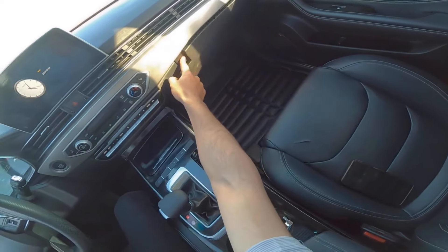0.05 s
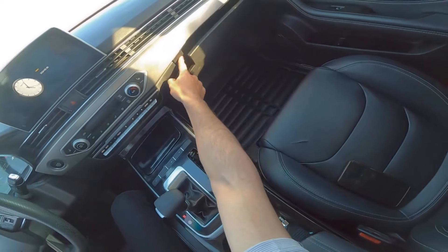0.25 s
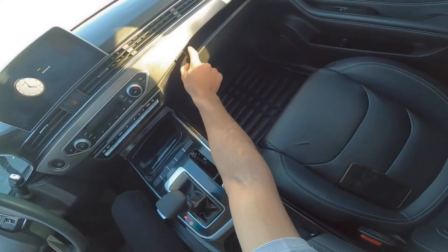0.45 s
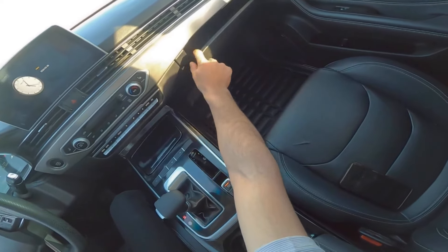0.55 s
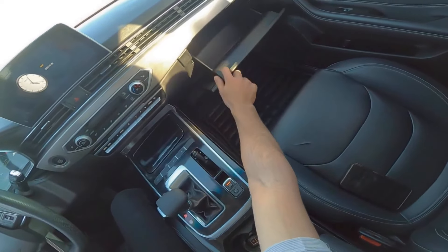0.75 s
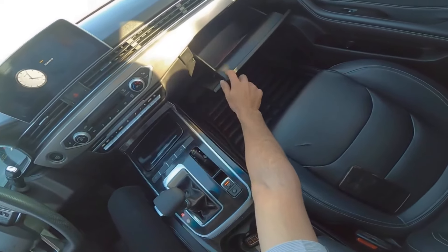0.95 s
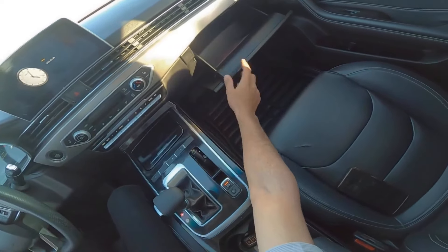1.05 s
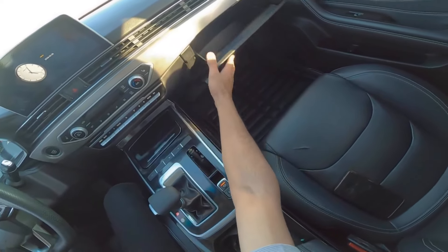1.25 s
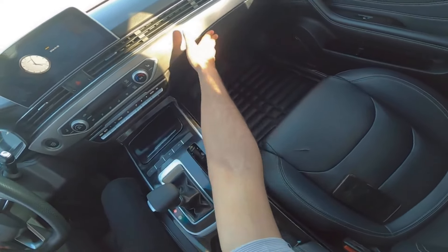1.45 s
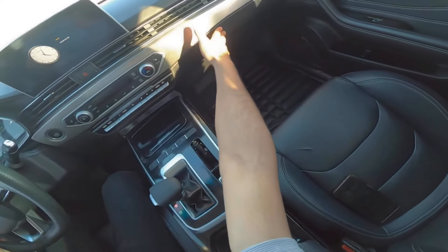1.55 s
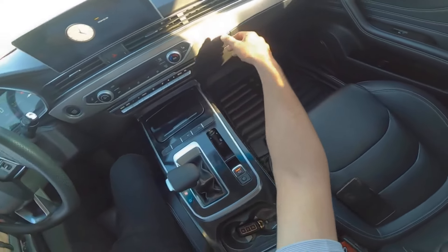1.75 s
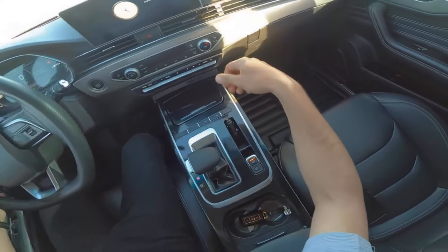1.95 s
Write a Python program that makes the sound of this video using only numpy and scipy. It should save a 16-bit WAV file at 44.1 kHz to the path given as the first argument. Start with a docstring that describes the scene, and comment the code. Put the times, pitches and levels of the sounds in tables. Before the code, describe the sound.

A plastic glove box is opened and shut close by inside a parked car, over a faint low idle hum. The latch clicks with a thud at 0.2 seconds and the handle snaps back at 0.5. The lid drops open with a thump and small bounce around 1 second, knocks lightly when lifted at 1.4, and shuts with a booming double clack at 1.6. Faint finger taps follow.

```python
"""Inside a parked car, engine idling; a stereo microphone in the cabin, the glove box close on the right.
A hand pulls the latch and lets the handle spring back. The plastic lid drops onto its stop and bounces,
is lifted, and is pushed shut with a double clack. Each knock is a short dense rattle of plastic
plus the modes of the struck part; heavy ones make the cabin boom."""
import sys
import numpy as np
from scipy import signal
from scipy.fft import rfft, irfft
from scipy.io import wavfile
from scipy.ndimage import uniform_filter1d

SR = 44100
rng = np.random.default_rng(int(sys.argv[2]) if len(sys.argv) > 2 else 0)


def transcribe(u):
    """Save the signal u as a 16-bit wav file named by the first command-line argument.

    u: samples, shape (n,) or (channels, n), limited to [-1, 1]; the rate is SR.
    q: integer samples, one column per channel.
    """
    v = np.clip(np.atleast_2d(u).T, -1, 1)
    q = np.round(v * 32767).astype(np.int16)
    wavfile.write(sys.argv[1], SR, q)


N = 88200
T = np.arange(N) / SR
BANDS_HZ = 25 * 2 ** (np.arange(28) / 3)
COLOUR_HZ = (300, 1100, 3000, 7500)  # centres of body, clack, bite and air

# The latch lets go at 0.22 s, the handle springs back at 0.5 s, the lid lands at 0.95 s,
# is lifted at 1.4 s and snaps home at 1.61 s; fingers tap its face at 1.83 s.
# t/s, part, rise/s, hold/s, t60/s, body/dB, clack/dB, bite/dB, air/dB, ring/dB, left minus right/dB
BOX_KNOCKS = [ (0.068, "handle", 0.0035, 0.0071, 0.08, -40.5, -45, -47.5, -49.5, -52.5, -1.5),
              (.090, "handle", 0.0013, .007, 0.12, -39.5, -39.5, -52, -76, -50.5, -2),
              (0.164, "latch", 0.0034, 0.0026, 0.1, -47.5, -68, -54.5, -60.5, -56, -0.5),
              (0.204, "latch", 0.0094, 0.0097, 0.028, -22.5, -28.5, -58, -65, -37.5, -3),
              (0.2158, "latch", 0.0007, 0.0031, 0.1, -21, -17.5, -21.5, -39.5, -21.5, -1.5),
              (0.253, "latch", 0.0067, 0.0095, 0.086, -29, -30, -50, -65.5, -44.5, -2),
              (0.487, "handle", 0.0029, 0.0022, 0.053, -49, -41, -54, -60, -45.5, -11.5),
              (0.4962, "handle", 0.0015, 0.0047, 0.069, -49, -18.5, -33.5, -48, -27.5, 0),
              (.521, "handle", .002, .003, .07, -30.5, -48, -69, -72.5, -50.5, -2.5),
              (0.9477, "lid", 0.0035, 0.0032, .06, -17, -21.5, -30, -43, -18, -0.5),
              (0.96, "lid", 0.0053, 0.0035, 0.25, -25, -31, -39.5, -54, -30.5, -1),
              (1.009, "lid", 0.0071, .004, 0.037, -31.5, -29, -44.5, -64.5, -28, -.5),
              (1.056, "lid", .005, .003, 0.1, -44, -47, -59, -70, -46, -2),
              (1.4012, "lid", 0.0025, 0.0039, 0.042, -35.5, -39.5, -40.5, -57.5, -36.5, -0.5),
              (1.407, "lid", 0.00033, 0.0034, 0.085, -29, -27.5, -40, -54, -41, -3.5),
              (1.421, "lid", 0.0041, .004, 0.076, -44, -47, -54, -66, -27.5, -1.5),
              (1.5553, "handle", 0.00057, 0.0026, 0.083, -36, -33, -30, -41, -39, 0),
              (1.5617, "handle", 0.00056, 0.0036, 0.089, -26, -26, -30.5, -55, -28, -2),
              (1.6144, "latch", 0.0024, 0.002, 0.055, -45.5, -14.5, -15, -29, -23, 0),
              (1.622, "latch", 0.00063, 0.0013, 0.028, -24.5, -20.5, -46.5, -60, -23.5, -3),
              (1.627, "latch", 0.0036, 0.0078, 0.099, -21.5, -26.5, -40.5, -46, -38.5, -1),
              (1.826, "face", 0.0035, 0.0067, 0.058, -63, -56.5, -68.5, -81.5, -51.5, -4),
              (1.879, "face", .006, 0.0029, 0.082, -58, -57, -66, -88, -47, -1.5), ]
# skin and plastic sliding: t/s, rise/s, hold/s, t60/s, body/dB, clack/dB, bite/dB, air/dB
BOX_RUBS = [ (0.13, 0.094, 0.024, .06, -50, -35, -51.5, -76.5),
            (0.846, 0.027, .025, 0.6, -50, -54.5, -65.5, -73.5),
            (1.306, 0.0051, 0.0047, .1, -50, -52.5, -61.5, -64),
            (1.433, 0.0071, 0.0087, 0.75, -64, -58, -62.5, -72),
            (1.577, 0.018, 0.018, 0.038, -38.5, -28, -40.5, -48.5),
            (1.754, 0.01, 0.054, 0.12, -62, -57.5, -69.5, -72.5),
            (1.806, 0.0037, 0.0058, 0.048, -55, -50.5, -64, -76), ]
# modes of the latch, face, lid and handle, by part: f/Hz, level/dB, t60/s
PART_MODES = { "latch": [(165, -12, .14), (229, -1.5, 0.15), (355, -7, .14), (472, -2, 0.11),
              (500, -3, .07), (676, -15, .11), (788, -5.5, .09), (996, -4, .11), (1088, -0.5, 0.055),
              (1164, -13.5, .09), (1453, -1, 0.053), (1946, -8.5, .1), (2840, -9, .07), (3090, -6, .055)],
              "face": [(906, 1, 0.086), (1037, 0, 0.092)], "lid": [(144.6, -0.5, 0.21), (220.5, 0.5, 0.078),
              (270, -4, 0.16), (376, -8.5, 0.17), (464.5, -13.5, 0.31), (568, -4.5, 0.036),
              (743, -8, 0.052), (1009, -24.5, 0.14), (2680, -19.5, .05)], "handle": [(175, -6.5, .15),
              (268, -9, .14), (469, -5.5, .14), (828, -5, .07), (911, -4.5, .07), (1144, -1, .07),
              (1293, 2, 0.055), (1322, -20.5, 0.35), (1492, -8, .08), (1520, -12.5, .08), (2005, -12, .07),
              (2652, -6.5, 0.058), (3040, -8, .045)], }
# slowly fading modes of the shut panel: f/Hz, level/dB, t60/s
PANEL_MODES = [(754, -2, .4), (1020, -8.5, 0.32), (1120, -5, 0.59), (1606, -7.5, 0.41), (1834, -5, .55),
               (2090, -13, 0.18)]
# rattle of the plastic trim, per third octave: f/Hz, level/dB
TRIM_SPECTRUM = [(160, -12.5), (250, -10.5), (330, -17.5), (480, -8), (720, -16), (1100, -13), (1450, -12),
                 (1900, -13.5), (2400, -11.5), (3000, -10), (4200, -9), (5500, -9.5), (7300, -7),
                 (9500, -14.5), (12000, -17), (15000, -22.5)]
# balance of the rattle at the microphone: f/Hz, left minus right/dB
TRIM_BALANCE = [(300, 2), (2000, -1), (4500, -2), (8000, 1.5), (13000, 2.5)]
# lowest modes of the cabin air: f/Hz, t60/s
CABIN_MODES = [(54, 0.3), (73, 0.14), (120, 0.3)]
# heavy pushes on the dashboard:
# t/s, rise/s, hold/s, pitch ratio, decay ratio, level/dB of the low, middle and top cabin mode
DASH_THUMPS = [ (.08, .025, .08, 1.05, 1.0, -62, -62, -39),
               (.213, 0.032, 0.0096, 0.97, 0.35, -33, -24, -16),
               (.495, .015, 0.021, 1.06, 1.0, -54.5, -47.5, -34),
               (.946, 0.004, 0.057, 1.014, 0.99, -25, -20, -16.5),
               (1.005, 0.022, 0.079, 1.09, 0.61, -24.5, -43.5, -40.5),
               (1.553, 0.054, 0.014, 1.03, 0.93, -33.5, -29, -17),
               (1.607, 0.0073, 0.0099, 1.04, 1.06, -21.5, -28.5, -21), ]
# tones of the idling engine and fan: f/Hz, level/dB
IDLE_TONES = [(26.9, -33), (53.8, -47), (75.4, -37.5), (123, -49.5), (247.6, -55.5), (495, -66)]
# cabin background, per third octave: f/Hz, level/dB
RUMBLE_SPECTRUM = [(25, -55), (40, -45), (60, -42.5), (85, -44.5), (110, -50.5), (160, -53.5), (250, -57),
                   (330, -60.5), (480, -63), (750, -78.5), (1200, -72.5), (2000, -82.5), (3200, -83.5),
                   (4500, -90.5), (7000, -91), (10000, -101), (15000, -108)]
# stereo width of the noises: f/Hz, side against mid/dB
STEREO_WIDTH = [(30, -21.5), (125, -20), (300, -14), (700, -11), (1400, -6.5), (2800, -6), (5500, -1.5),
                (9000, -1.5), (14000, -11)]

IDLE_WAVER_DB, IDLE_WOBBLE_RAD = 4.6, 0.094
RIPPLE_DB, RIPPLE_WIDTH_HZ, RIPPLE_FULL_HZ = 1, 46.1, 4400  # narrow resonances of the trim
TREBLE_DAMPING, UPHOLSTERY_DAMPING = 0.02, 0.32  # exponents: t60 shortens with frequency
HARD_AIR_DB, SOFTENING = -24, 0.25  # top-octave loss per octave and per dB of air short of a hard knock
MODE_SPREAD_RAD, RIGHT_LEAD_S = 0.14, 0.00003  # the box is nearer the right side of the microphone
SHUT_S, PANEL_DB = 1.6, -31  # once the lid sits in its frame, the latch rings the panel too
TAIL_DB, TAIL_T60_S, TAIL_BAND_HZ = -43, 1, (500, 2600)


def undb(db):
    """Decibels to gain."""
    return 10 ** (np.asarray(db) / 20)


def at(points, hz):
    """Read a table of f/Hz, value on a log frequency axis."""
    freqs, values = np.array(points, float).T
    return np.interp(np.log(hz), np.log(freqs), values)


def wander(seconds):
    """Smooth random drift with spread 1."""
    span = int(seconds * SR)
    drift = uniform_filter1d(rng.standard_normal(N), span, mode="wrap")
    drift = uniform_filter1d(drift, span, mode="wrap")
    return (drift - drift.mean()) / drift.std()


def band_noise(gain=1):
    """Stereo third-octave noises of even strength, wider towards the treble: bands x 2 x N."""
    octaves = np.log2(np.maximum(np.arange(N // 2 + 1) * SR / N, 1))
    bands = []
    for hz in BANDS_HZ:
        shape = np.cos(np.clip((octaves - np.log2(hz)) * 3, -1, 1) * np.pi / 2)
        noise = irfft(rfft(rng.standard_normal((2, N))) * shape * gain, N)
        span = int(SR * max(5 / hz, .014))
        mid, side = noise / np.sqrt(uniform_filter1d(noise ** 2, span, mode="wrap"))
        side = side * undb(at(STEREO_WIDTH, hz))
        bands.append([mid + side, mid - side])
    return np.array(bands)


def envelope(t, rise, hold, t60):
    """Rise, hold, exponential release."""
    return np.clip(t / rise, 0, 1) * np.exp(-np.log(1000) * np.maximum(t - rise - hold, 0) / t60)


def event_window(start):
    """Samples and local time of the 0.36 s after an onset."""
    span = slice(int(start * SR), min(int((start + .36) * SR), N))
    return span, T[span] - start


def idle():
    """Wavering engine and fan tones over a dull rumble, all around the microphone."""
    hum = 0
    for hz, db in IDLE_TONES:
        amplitude = np.sqrt(2) * undb(db + IDLE_WAVER_DB * wander(0.12))
        phase = 2 * np.pi * (hz * T + rng.random()) + IDLE_WOBBLE_RAD * wander(0.06)
        hum += amplitude * np.sin(phase)
    return hum + np.tensordot(undb(at(RUMBLE_SPECTRUM, BANDS_HZ)), band_noise(), 1)


def trim_noise():
    """Band noises coloured by the trim's narrow resonances, the same in every knock."""
    hz = np.arange(N // 2 + 1) * SR / N
    ripple = uniform_filter1d(rng.standard_normal(len(hz)), int(RIPPLE_WIDTH_HZ * N / SR))
    gain = undb(RIPPLE_DB * np.minimum(hz / RIPPLE_FULL_HZ, 1) * ripple / ripple.std())
    gain /= np.sqrt(uniform_filter1d(gain ** 2, size=900))
    balance = undb(at(TRIM_BALANCE, BANDS_HZ)[:, None, None] * np.array([[.5], [-.5]]))
    return band_noise(gain) * balance


def rattle(noise, t, rise, hold, t60, colour):
    """Dense, quickly damped resonances of the trim; gentle contacts are duller."""
    out = 0
    for hz, band in zip(BANDS_HZ, noise):
        if hz > 140:
            above_air = max(hz / COLOUR_HZ[-1], 1)
            db = at(TRIM_SPECTRUM, hz) + np.interp(np.log(hz), np.log(COLOUR_HZ), colour)
            db += SOFTENING * (colour[-1] - HARD_AIR_DB) * np.log2(above_air)
            decay = t60 * (COLOUR_HZ[1] / hz) ** TREBLE_DAMPING / above_air ** UPHOLSTERY_DAMPING
            out += undb(db) * band * envelope(t, rise, hold, decay)
    return out


def ring(modes, t, rise, hold):
    """The struck part's modes build up over the contact and reach the two channels out of step."""
    out = 0
    for hz, db, t60 in modes:
        scatter, start_cycles = rng.standard_normal(2)
        skew = scatter * MODE_SPREAD_RAD * min(hz / COLOUR_HZ[1], 2) - np.pi * hz * RIGHT_LEAD_S
        wave = np.sin(2 * np.pi * (hz * t + start_cycles) + np.array([[skew], [-skew]]))
        out += undb(db) * wave * envelope(t, rise + hold / 2, 0, t60)
    return out


def glove_box():
    """Handle, latch and lid at close range: knocks rattle the trim and ring the part, rubs only rattle."""
    out, noise = np.zeros((2, N)), trim_noise()
    for start, part, rise, hold, t60, *colour, ring_db, pan_db in BOX_KNOCKS:
        span, t = event_window(start)
        knock = rattle(noise[:, :, span], t, rise, hold, t60, colour)
        knock += undb(ring_db) * ring(PART_MODES[part], t, rise, hold)
        if part == "latch" and start > SHUT_S:
            knock += undb(ring_db + PANEL_DB) * ring(PANEL_MODES, t, rise, hold)
        out[:, span] += knock * undb([[pan_db / 2], [-pan_db / 2]])
    for start, rise, hold, t60, *colour in BOX_RUBS:
        span, t = event_window(start)
        out[:, span] += rattle(noise[:, :, span], t, rise, hold, t60, colour)
    return out


def after_ring(box):
    """Faint midrange tail of the dashboard and cabin behind the direct sound."""
    midrange = signal.butter(2, TAIL_BAND_HZ, "band", fs=SR, output="sos")
    tail = signal.sosfilt(midrange, rng.standard_normal((2, N)))
    tail *= np.exp(-np.log(1000) * T / TAIL_T60_S)
    tail *= undb(TAIL_DB) / np.linalg.norm(tail[0])
    return signal.fftconvolve(box, tail, axes=1)[:, :N]


def cabin_boom():
    """The dashboard pushes the cabin air into its lowest modes."""
    out = np.zeros(N)
    for start, rise, hold, pitch, decay, *levels in DASH_THUMPS:
        span, t = event_window(start)
        for (hz, t60), db in zip(CABIN_MODES, levels):
            wave = np.sqrt(2) * np.sin(2 * np.pi * hz * pitch * t)
            out[span] += undb(db) * wave * envelope(t, rise, hold, t60 * decay)
    return out


def scene():
    """The glove box in the idling car; at the microphone the bass leans slightly right."""
    box, lean_db = glove_box(), .3
    bass = cabin_boom() + idle()
    return box + after_ring(box) + bass * undb([[-lean_db], [lean_db]])


def record(dry):
    """The recorder cuts the top steeply."""
    top_hz = 14800
    return signal.sosfilt(signal.ellip(8, .2, 70, top_hz, fs=SR, output="sos"), dry)


dry = scene()
out = record(dry)
transcribe(out)
```